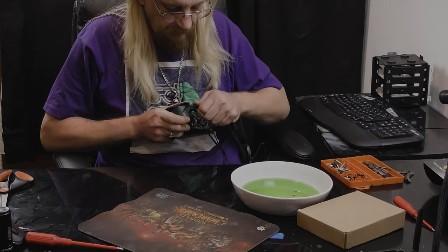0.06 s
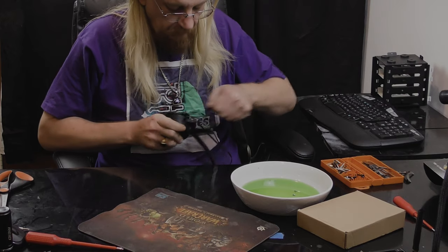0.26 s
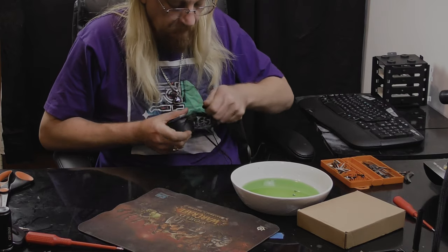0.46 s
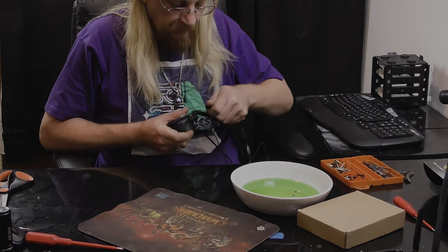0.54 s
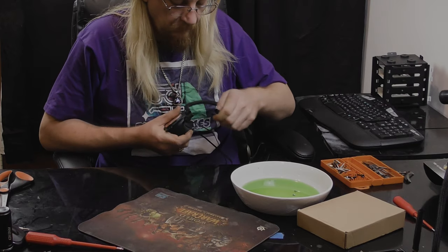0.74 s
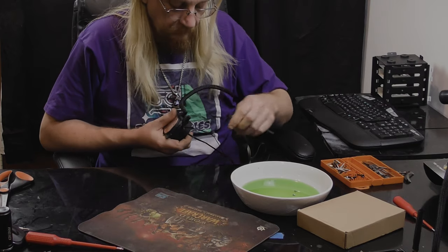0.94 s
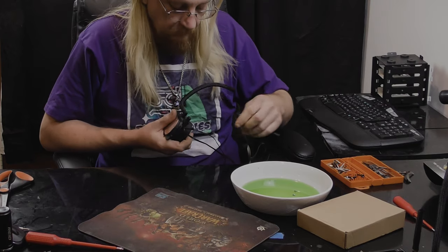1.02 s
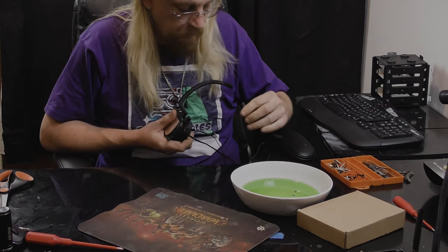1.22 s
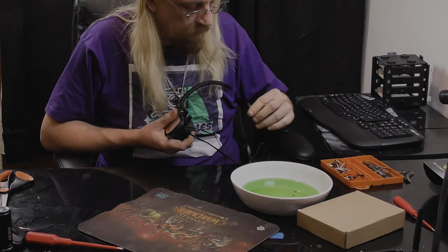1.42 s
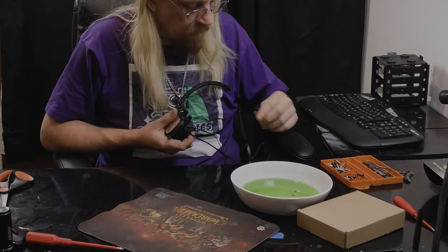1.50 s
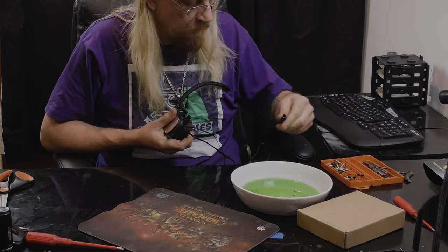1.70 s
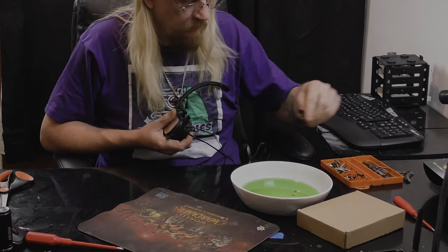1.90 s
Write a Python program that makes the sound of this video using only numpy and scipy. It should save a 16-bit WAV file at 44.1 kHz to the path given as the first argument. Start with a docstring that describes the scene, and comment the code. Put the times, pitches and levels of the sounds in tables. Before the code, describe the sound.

A plastic fitting snaps loose in two sharp cracks, the second brighter and louder; a small part bounces on the desk and fades, followed by faint ticks and handling in a lively room, close, nearly mono microphone.

```python
"""Mains hum, fan lines, room air, a thin whine and a slowly fading hum fill the quiet; hands thud and rustle.
Early on a plastic hose fitting snaps off a pump block in two sharp cracks: noisy bursts ring its body.
Then a loose part bounces on the desk, ringing the desk's modes, and a few faint ticks follow.
A lively room, made of decaying noise, answers each of these; the sound is almost mono.
A gain control ducks under the cracks."""
import sys
import numpy as np
from scipy import signal
from scipy.fft import rfft, irfft, next_fast_len
from scipy.io import wavfile
from scipy.ndimage import uniform_filter1d, map_coordinates

SR = 44100
rng = np.random.default_rng(int(sys.argv[2]) if len(sys.argv) > 2 else 0)


def output_pcm(signal):
    """Save a mono or channel-first signal as 16-bit PCM at the path in sys.argv[1].

    Samples are clipped to [-1, 1] before scaling.
    """
    pcm = np.clip(np.atleast_2d(signal).T, -1, 1) * 32767
    wavfile.write(sys.argv[1], SR, np.round(pcm).astype(np.int16))


N = 85995
TIME = np.arange(N) / SR


def amp(db):
    """Decibels to an amplitude factor."""
    return 10 ** (np.asarray(db) / 20)


def unit(x):
    """x scaled to an rms of 1."""
    return x / np.sqrt(np.mean(x ** 2) + 1e-20)


def along(points, hz):
    """Read a curve of (Hz, value) points, joined by lines on a log frequency axis."""
    point_hz, values = np.transpose(points)
    return np.interp(np.log(hz + 1), np.log(point_hz + 1), values)


def filtered(x, response):
    """x filtered by a response, real or complex, given as a function of frequency."""
    size = next_fast_len(x.shape[-1] + 8192)
    spectrum = rfft(x, size) * response(np.fft.rfftfreq(size, 1 / SR))
    return irfft(spectrum, size)[..., :x.shape[-1]]


def causal(gain):
    """The minimum-phase impulse response with these gains: it starts at once, with no pre-ring."""
    cepstrum = irfft(np.log(gain + 1e-5))
    half = len(cepstrum) // 2
    cepstrum[1:half] *= 2
    cepstrum[half + 1:] = 0
    return irfft(np.exp(rfft(cepstrum)))[:half]


def wobble(rate):
    """A smooth random curve through Gaussian knots, rate knots a second."""
    knots = rng.standard_normal(int(N * rate / SR) + 4)
    return map_coordinates(knots, [np.arange(N) * rate / SR])


def tone(hz, db):
    """A sine of the given rms level, starting at a random phase."""
    return np.sqrt(2) * amp(db) * np.sin(2 * np.pi * (hz * TIME + rng.random()))


def swell(centre_s, length_s):
    """A bell-shaped envelope with a top of 1, down to 1/e one length either side."""
    return np.exp(-((TIME - centre_s) / length_s) ** 2)


def click(hz, octaves, rise_ms, modes):
    """A splintering push and a sudden release drive the body's modes; gives the click (peak 1) and its ring."""
    crackle_t60_s, crackle_level, low_cut_hz = .009, .2, 280
    t = np.arange(1024) / SR
    f = np.fft.rfftfreq(4096, 1 / SR) + 1
    rise_s = max(rise_ms, .02) / 1000
    # noise swells up to the release, then splinters away
    envelope = np.clip(t / rise_s, 0, 1) ** 2 * amp(-60 * np.maximum(t - rise_s, 0) / crackle_t60_s)
    push = envelope * crackle_level * rng.standard_normal(len(t))
    push[np.argmax(t >= rise_s)] += 2  # the release itself
    body_power = 1
    if modes:
        body_power = sum(amp(2 * db) * (f * width) ** 2 / ((centre ** 2 - f ** 2) ** 2 + (f * width) ** 2)
                         for centre, width, db in modes)
    colour = amp(-6 * (np.log2(f / hz) / octaves) ** 2)
    low_cut = 1 / (1 + (low_cut_hz / f) ** 4)
    ring = causal(np.sqrt(body_power) * colour * low_cut)
    x = signal.fftconvolve(push, ring)
    x = x / np.abs(x).max()
    # the ring carries the click's energy into the room
    return x, ring * np.linalg.norm(x) / np.linalg.norm(ring)


def room(x, share):
    """Reverberation as fresh noise, mid and side, in which each frequency dies at its own speed."""
    # decay: (frequency [Hz], t60 [s])
    decay = [(200, 0.61), (600, 0.49), (1500, 0.37), (2600, 0.48), (3400, 0.37), (4200, 0.4), (6000, 0.37),
             (9000, 0.3), (14000, 0.24)]
    # colour of the tail: (frequency [Hz], gain [dB])
    tail_tone = [(200, 4.5), (320, 5.5), (470, -1), (700, 5), (1000, 2.5), (1500, 3), (2600, -3),
                 (3400, 1.5), (6000, -4.5), (10000, 1), (15000, -3)]
    # further colour of the side alone: (frequency [Hz], gain [dB])
    side_tone = [(150, -21), (400, -3.5), (700, -2.5), (1400, -9.5), (2800, -11), (5000, -3), (9000, -9),
                 (12000, -26)]
    first_wall_s, build_s, side_db = .0025, .003, -27
    early_t60_s, early_db = 0.024, -3.5

    hz, t, z = signal.stft(rng.standard_normal((2, SR)), SR, nperseg=256)
    side_db_curve = side_db + along(side_tone, hz)
    colour_db = along(tail_tone, hz) + np.array([0 * hz, side_db_curve])
    fall_db = 60 * t / (share * along(decay, hz)[:, None])
    tail = signal.istft(z * amp(colour_db[..., None] - fall_db), SR, nperseg=256)[1]
    t = np.arange(tail.shape[1]) / SR
    build = 1 - np.exp(-t / build_s)
    early = 1 + amp(early_db - 60 * t / early_t60_s)  # near surfaces answer first, over the long tail
    tail = tail * build * early
    tail = np.pad(tail / np.linalg.norm(tail[0]), ((0, 0), (round(first_wall_s * SR), 0)))
    return signal.fftconvolve(x[None], tail, axes=1)


def snaps_bounces_ticks():
    """Cracks ring the plastic, bounces ring the desk, ticks have no modes; each adds its room, as mid and side."""
    # The next three share these columns: (time [s], peak level before shading [dB], centre of colour [Hz],
    # colour width to -6 dB [octaves], rise [ms], room level relative to the click [dB])
    # the fitting snaps off
    snaps = [(.2068, -2, 2179, 2, 1.2, -6.5), (0.2387, 6.5, 4900, 1.7, 0.083, -2)]
    # the loose part lands and bounces on the desk
    bounces = [(.3452, -17, 1740, 0.9, 0.4, -2.5), (.402, -29.5, 4300, 0.79, 0.24, -6.5),
               (.438, -34, 1510, .6, 0.77, -4.5), (.541, -44.5, 3540, 0.43, 0.25, 1)]
    # small things tick faintly
    ticks = [(.7224, -43.5, 5290, 0.17, 0.098, -7), (.8447, -43, 3780, 0.5, 0.13, -5),
             (1.925, -70.5, 5000, 0.36, .5, 4)]
    # modes of the fitting's body: (frequency [Hz], width [Hz], gain [dB])
    plastic = [(455, 110, 5), (856, 37, -1), (1160, 150, -5), (2150, 430, -0.5), (3430, 450, 2),
               (3950, 450, -6), (4500, 440, -8), (5760, 1000, -1.5), (7000, 150, -4), (7860, 140, -10),
               (10500, 2800, -14.5), (13100, 2000, -19.5)]
    # modes of the desk: (frequency [Hz], width [Hz], gain [dB])
    desk = [(1403, 230, -2.5), (2265, 1040, -2.5), (2640, 610, -3), (4300, 1800, -1.5)]
    tick_tail = 0.47  # the ticks' tail, as a share of the room's t60
    shade_hz = 9000  # the hands shade the treble of the direct sound

    def shade(f):
        return 1 / (1 + 1j * f / shade_hz) ** 2

    out = np.zeros((2, N + 2 * SR))
    for rows, share, modes in ((snaps, 1, plastic), (bounces, 1, desk), (ticks, tick_tail, [])):
        for s, db, hz, octaves, rise_ms, room_db in rows:
            x, ring = click(hz, octaves, rise_ms, modes)
            at = round(s * SR)
            wet = amp(db + room_db) * room(ring, share)
            out[0, at:at + len(x)] += amp(db) * filtered(x, shade)
            out[:, at:at + wet.shape[1]] += wet
    return out[:, :N]


def thuds():
    """Soft low thuds of hands and desk: short bell-shaped bursts of a sine."""
    # (time of the top [s], pitch [Hz], length [s], rms level at the top [dB])
    pushes = [(0.09, 104, 0.026, -71.5), (0.207, 160, .015, -65), (0.302, 185, 0.044, -60.5),
              (0.463, 150, 0.031, -75), (1.062, 240, 0.013, -68.5), (1.153, 132.1, 0.025, -78.5),
              (1.364, 119.8, .025, -74), (1.475, 101.7, .025, -75), (1.584, 94.4, 0.015, -67),
              (1.625, 169.7, 0.018, -76.5), (1.816, 153.7, .04, -78.5), (1.864, 248.6, 0.015, -68)]
    return sum(tone(hz, db) * swell(s, length) for s, hz, length, db in pushes)


def rustles():
    """Soft rustles of hands and cloth: short swells of band noise."""
    # (time of the top [s], length [s], centre [Hz], width to -6 dB [octaves], rms level at the top [dB])
    brushes = [(.05, 0.021, 7000, 0.43, -82), (0.047, 0.027, 900, 0.28, -83.5),
               (0.743, 0.024, 10500, 0.5, -85.5), (0.735, 0.049, 3060, 0.87, -77.5),
               (.965, 0.033, 6310, 0.5, -85.5), (1.048, 0.034, 1233, 0.4, -87),
               (1.142, 0.025, 1215, 0.25, -80.5), (1.279, .02, 1082, 0.23, -86.5),
               (1.347, 0.024, 5220, 0.31, -90), (1.375, 0.013, 1010, 0.43, -82.5),
               (1.486, 0.0086, 1340, 0.18, -81.5), (1.57, 0.028, 1475, 0.2, -87),
               (1.692, 0.028, 900, 0.31, -81.5), (1.78, 0.042, 1820, 0.33, -98),
               (1.852, 0.019, 1175, 0.35, -88.5)]

    def band(hz, octaves):
        noise = rng.standard_normal(N)
        return unit(filtered(noise, lambda f: amp(-6 * (np.log2((f + 1) / hz) / octaves) ** 2)))

    return sum(amp(db) * band(hz, octaves) * swell(s, length) for s, length, hz, octaves, db in brushes)


def whine():
    """Thin electronic lines at multiples of one pitch, wavering in level, with brief swells."""
    # steady lines: (multiple, rms level before wavering [dB])
    lines = [(2, -93.5), (3, -99.5), (4, -97.5), (5, -101)]
    # brief swells: (time of the top [s], length [s], multiple, rms level added at the top, before wavering [dB])
    swells = [(0.56, 0.036, 2, -63.5), (0.747, 0.019, 2, -78.5), (0.742, 0.0244, 3, -70.5),
              (0.733, .025, 5, -85.5), (.868, 0.025, 2, -65.5), (0.863, .025, 3, -78),
              (0.975, 0.017, 3, -91.5), (1.363, 0.044, 2, -95), (1.35, 0.037, 3, -94),
              (1.94, 0.042, 2, -82)]
    base_hz = 2000.1
    out = np.zeros(N)
    for k, base_db in lines:
        level = amp(base_db) + sum(amp(db) * swell(s, length)
                                   for s, length, multiple, db in swells if round(multiple) == round(k))
        out += tone(k * base_hz, 3.4 * wobble(8.6)) * level
    return out


def mains_and_fan():
    """Mains hum and fan lines: sines at multiples of the mains and blade rates, wavering above the mains rate."""
    # mains: (multiple, rms level before wavering [dB])
    mains = [(1, -59), (2, -94.5), (3, -97.5), (5, -90), (7, -91.5), (11, -95), (13, -99), (15, -107),
             (19, -101), (21, -96.5), (27, -100)]
    # fan blades: (multiple, rms level before wavering [dB])
    blades = [(2, -94.5), (4, -92), (5, -96.5), (6, -99), (8, -101), (9, -101)]
    mains_hz, blade_hz = 50, 148.2
    hum = sum(tone(k * mains_hz, db + (k > 1) * 0.83 * wobble(18)) for k, db in mains)
    fan = sum(tone(k * blade_hz, db + 4.4 * wobble(5)) for k, db in blades)
    return hum + fan


def fading_hum():
    """A low hum that dies away: a sine roughened by a narrow band of noise round it."""
    hz, width_hz, roughness = 444.5, 16, 1
    start_db, t60_s = -62, 6.4
    fuzz = unit(filtered(rng.standard_normal(N), lambda f: 1 / (1 + ((f - hz) / width_hz) ** 2)))
    drone = unit(tone(hz, 0) + roughness * fuzz)
    return drone * amp(start_db - 60 * TIME / t60_s)


def air():
    """Room air: coloured noise whose level drifts in patches of time and frequency."""
    # depth of the patches: (frequency [Hz], spread [dB])
    patch_depth = [(100, 5), (1500, 4.5), (3000, 2.5), (8000, 1.5)]
    # colour of the air: (frequency [Hz], relative level [dB])
    air_tone = [(20, -24.5), (70, -9.5), (110, -1.5), (170, -5.5), (250, -9), (400, -15), (700, -15.5),
                (1300, -23.5), (2000, -22), (3500, -30), (6000, -33.5), (8500, -34.5), (11500, -33),
                (12500, -51), (16500, -51)]
    rms_db = -78
    hz, _, z = signal.stft(rng.standard_normal(N), SR, nperseg=1024)
    field = uniform_filter1d(rng.standard_normal(z.shape), size=6, axis=0)  # smooth over frequency
    field = uniform_filter1d(field, size=4, axis=1)  # smooth over time
    patches = amp(along(patch_depth, hz)[:, None] * unit(field))
    x = signal.istft(z * patches, nperseg=1024)[1][:N]
    return amp(rms_db) * unit(filtered(x, lambda f: amp(along(air_tone, f))))


def scene():
    """All layers as left and right; only the room tails have a side part."""
    mid, side = snaps_bounces_ticks()
    mid = mid + thuds() + rustles() + whine() + mains_and_fan() + fading_hum() + air()
    return np.array([mid + side, mid - side])


def record(dry):
    """Gain control follows the smoothed loudness, peaks round off softly; nothing passes above the band limit."""
    knee_db, squeeze = -33, .45  # squeeze: dB of cut per dB above the knee
    ceiling, top_hz = 1.3, 16400
    power = np.mean(dry ** 2, axis=0)
    for smooth_s in (.004, .022):  # two smoothers in a row
        keep = np.exp(-1 / (smooth_s * SR))
        power = signal.lfilter([1 - keep], [1, -keep], power)
    gain_db = -squeeze * np.maximum(10 * np.log10(power + 1e-12) - knee_db, 0)
    rounded = ceiling * np.tanh(dry * amp(gain_db) / ceiling)
    return filtered(rounded, lambda hz: hz < top_hz)


dry = scene()
out = record(dry)
output_pcm(out)
```